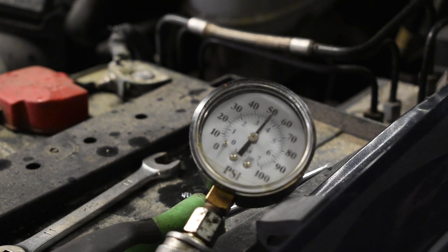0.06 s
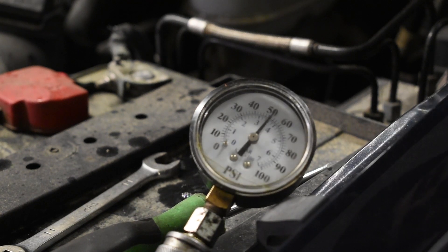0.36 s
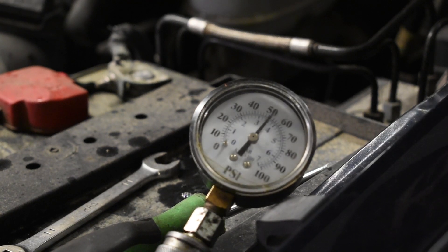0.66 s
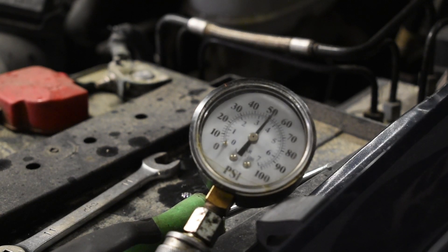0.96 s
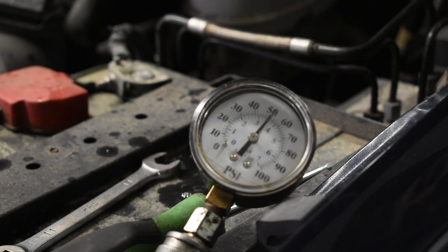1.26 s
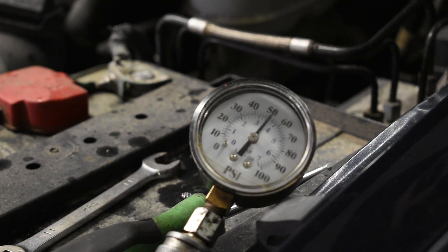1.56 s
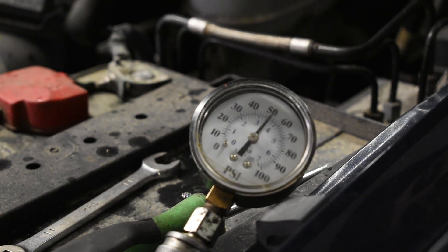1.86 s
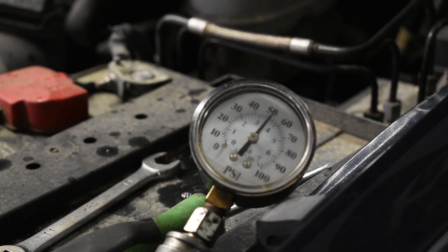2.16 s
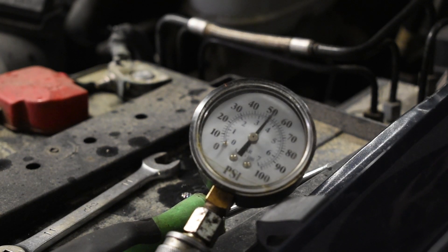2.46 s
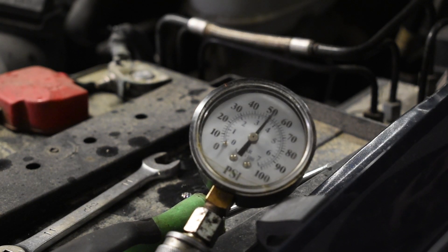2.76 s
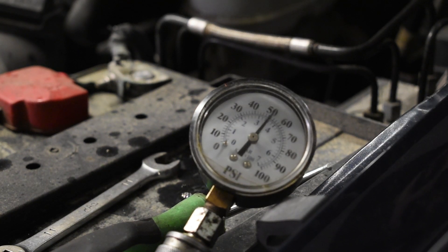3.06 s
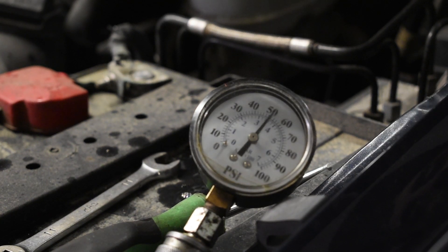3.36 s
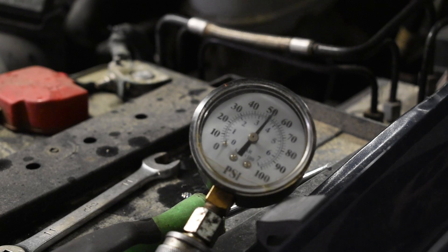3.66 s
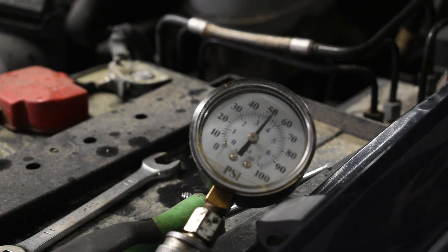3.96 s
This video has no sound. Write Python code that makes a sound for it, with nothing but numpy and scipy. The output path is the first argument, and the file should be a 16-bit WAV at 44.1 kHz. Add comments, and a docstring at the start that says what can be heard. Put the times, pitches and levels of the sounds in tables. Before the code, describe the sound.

A fast metallic clicking buzz of fuel injectors runs, then stops abruptly.

```python
"""A fast metallic buzz: eight solenoid valves, probably fuel injectors, click in turn in an open engine bay.
Each snaps open and shut and rings with its own voice, so the buzz pulses once a round.
The rounds quicken in two steps and stop on a last clack at 3.5 s. That leaves bare what ran
underneath all along: a faintly throbbing pump, a wavering hum and the air of the workshop."""
import sys
import numpy as np
from scipy.fft import rfft, irfft, next_fast_len
from scipy.io import wavfile
from scipy.ndimage import uniform_filter1d, map_coordinates

SR = 44100
rng = np.random.default_rng(int(sys.argv[2]) if len(sys.argv) > 2 else 0)


def to_wav(sig):
    """Store sig (one row per channel, or 1-D mono) as 16-bit WAV at the path in sys.argv[1].

    Samples outside -1..1 are clipped; the rate is SR.
    """
    pcm = np.clip(np.atleast_2d(sig), -1, 1) * 32767
    pcm = np.round(pcm).astype(np.int16)
    wavfile.write(sys.argv[1], SR, pcm.T)  # frames by channels


N = 176400
RING_T = np.arange(int(.3 * SR)) / SR  # time axis of one hit

# colour of the workshop air: f/Hz, relative level/dB
AIR_COLOUR = [(25, -18), (55, -12), (100, -7.5), (190, -14), (260, -3.5), (430, -8), (650, -7.5),
              (1050, -14), (3000, -27.5), (8800, -29.5), (12000, -35), (15500, -41)]
# partials of the machine hum: f/Hz, level/dB
HUM_PARTIALS = [(54, -84), (160, -85.5), (241, -72.5), (279, -73), (377, -74), (500, -78), (612, -74.5)]
# swells and dips of a low drone in the hum: t/s, level/dB
DRONE_LEVELS = [(0.0, -78.5), (1.61, -79.5), (1.73, -70), (1.84, -88), (1.94, -72), (2.09, -80),
                (2.16, -71), (2.31, -80), (2.38, -66.5), (2.47, -78), (2.54, -71), (3.85, -78), (3.95, -74),
                (4.0, -91)]

# colour of a pump throb: f/Hz, relative level/dB
THROB_COLOUR = [(200, -23), (450, -13.5), (620, -2.5), (760, 2), (950, -15), (1600, -20), (3000, -31),
                (8000, -31.5), (15000, -44)]
# pump throbs after the buzz: t/s, level/dB, attack/s
BARE_THROBS = [(3.515, -58, .004), (3.570, -53.5, .004), (3.628, -53, .005), (3.684, -58.5, .001),
               (3.734, -59.5, 0.0013), (3.794, -53.5, 0.0091), (3.845, -57, .006), (3.906, -56, 0.0022),
               (3.959, -56.5, .002)]

# colour of a click: f/Hz, relative level/dB
CLICK_COLOUR = [(150, -40), (280, -8), (450, -11.5), (800, -5.5), (1120, -0.5), (1340, -9), (1520, -3.5),
                (1850, -2.5), (2080, -0.5), (2380, 1), (2700, -7), (3100, -2.5), (3700, -3), (5200, -5),
                (6450, 1.5), (8000, -4), (9500, 1.5), (11000, -5), (13500, -10), (15700, -16.5)]
# colour of the crowded modes in the surrounding metal: f/Hz, relative level/dB
WASH_COLOUR = [(600, -28.5), (1100, -4.5), (1330, -12.5), (1600, -0.5), (1850, -2.5), (2050, -13.5),
               (2300, -8.5), (2700, -16), (3700, -14), (5200, -20.5), (6250, -12.5), (7800, -24.5),
               (9200, -21), (15000, -49)]
# low modes of the fuel rail, rung by every valve: f/Hz, level/dB, t60/s
RAIL_MODES = [(798.3, -68, 0.15), (960.7, -69.5, 0.14)]
# each valve's modes on its seat in the rail: f/Hz, level/dB, wait/ms (negative acts as 0)
VALVE_VOICES = [
    [(1034, -45.5, 5.6), (1558, -42, 5.5), (1794, -37.5, 0), (2447, -44.5, .3), (2290, -45.5, 6),
     (3647, -46, 0.6), (6620, -42.5, 1), (7105, -44, 2), (9152, -41, 0.5)],
    [(963.6, -46, 1.4), (1187, -46.5, 5), (1615, -36, 1.5), (1749, -37, 0), (2280, -50, 4), (2813, -51, 1),
     (3820, -49, 6), (6220, -49.5, 3)],
    [(1106.4, -42, 2.45), (1682, -41.5, 6), (1756, -37.5, .2), (2993, -52, 2.9), (5950, -49, 3),
     (6740, -49, 5.6), (9260, -48, 3.5)],
    [(1625, -54, 0.73), (1820, -42, 3.1), (3120, -52, 0.95), (6530, -48.5, 2), (7470, -41, 2.5),
     (10330, -40.5, 2), (11460, -49, 2.2), (12300, -50, 2)],
    [(1098, -46.5, -2), (1745, -39.5, 0.6), (1914, -46, 5.5), (3210, -54, -0.5), (6174, -50, 0.5)],
    [(1140, -46.5, 0.5), (1508, -43.5, 3), (1668, -41.5, -1.5), (1886, -47, 7), (3710, -50.5, 0),
     (6320, -41.5, 0), (9270, -44, 0), (9860, -49, 4)],
    [(980, -48, 2.7), (1167, -47, 7.1), (1667, -37.6, 1.6), (3670, -52, 1), (4460, -48.5, 0.51),
     (4810, -49, 1.3), (11430, -46.5, 0.87)],
    [(1110.5, -40.5, .4), (1598, -47, 2.5), (1814, -44.5, 3.3), (6050, -48.5, 4.4), (6500, -47, 3.6),
     (9380, -50, 3), (10885, -48.5, 1.9), (13680, -52, 3)],
]
# clicks in firing order: lag/ms, time open/ms, opening level/dB, closing level/dB, tilt/(dB per octave)
VALVE_CLICKS = [(.1, 2, -47, -44, -0.1), (1.2, 3.2, -51.5, -47, 0), (2, 3, -49, -49.5, 0),
                (.1, 3.2, -45, -45, 0.4), (.5, 2.9, -51, -48.5, 0), (.5, 1.5, -47, -46, 1),
                (.6, 3.3, -47, -46.5, -0.5), (2.4, 2, -49, -46, 1.5)]
# stretches of even firing: start t/s, valve-to-valve step/s, number of strokes
FIRING_RUNS = [(-.001, .01375, 8), (.109, .0125, 239), (3.0965, .01125, 36)]
METAL_ATTACK_S = 0.0018


def amp(db):
    """Decibels to gain."""
    return 10 ** (np.asarray(db) / 20)


def along(points, hz):
    """Read a colour curve on a log frequency axis."""
    f, db = np.transpose(points)
    return np.interp(np.log(hz + 1), np.log(f + 1), db)


def noise(colour, size=len(RING_T), eq=lambda hz: 0):
    """Noise of rms 1, shaped by a colour table and an optional EQ curve in dB."""
    hz = np.fft.rfftfreq(size, 1 / SR)
    phases = np.exp(2j * np.pi * rng.random(len(hz)))
    x = irfft(amp(along(colour, hz) + eq(hz)) * phases, size)
    return x / np.sqrt(np.mean(x ** 2) + 1e-20)


def wobble(rate):
    """A smooth random curve, rate knots a second."""
    knots = rng.standard_normal(int(N * rate / SR) + 4)
    return map_coordinates(knots, [np.arange(N) * rate / SR])


def add(track, s, sound):
    """Mix a sound into the track at s seconds."""
    i = round(s * SR)
    part = sound[max(-i, 0):max(N - i, 0)]
    track[max(i, 0):][:len(part)] += part


def delayed(x, ms):
    """Delay x, keeping its length."""
    return np.pad(x, (max(round(ms * SR / 1000), 0), 0))[:len(x)]


def fade(attack_s, t60_s):
    """A quick attack and an exponential tail."""
    return (1 - np.exp(-RING_T / attack_s)) * np.exp(-np.log(1000) * RING_T / t60_s)


def ring(hz, db, attack_s, t60_s, wait_ms=0):
    """One damped mode, which may swell a little late."""
    return amp(db) * np.sin(2 * np.pi * hz * RING_T) * delayed(fade(attack_s, t60_s), wait_ms)


def workshop_air():
    """A quiet, dark bed of room tone."""
    return amp(-68) * noise(AIR_COLOUR, N)


def machine_hum():
    """Low partials and a swelling drone, each wavering in level and phase."""
    waver_db, drift_rad, drone_hz = 1, 0.52, 123.3
    t = np.arange(N) / SR
    drone_db = np.interp(t, *np.transpose(DRONE_LEVELS))
    out = np.zeros(N)
    for hz, db in [*HUM_PARTIALS, (drone_hz, drone_db)]:
        peak = np.sqrt(2) * amp(db + waver_db * wobble(8.01))
        out += peak * np.sin(2 * np.pi * hz * t + drift_rad * wobble(8))
    return out


def pump():
    """The pump throbs in soft puffs, about eighteen a second, under the buzz and after it."""
    period_s, jitter_s, covered_db, covered_attack_s = .0555, .003, -57.5, 0.0027
    beats = BARE_THROBS[0][0] - period_s * np.arange(1, 64)
    covered = [(s + jitter_s * rng.standard_normal(), covered_db, covered_attack_s) for s in beats]
    out = np.zeros(N)
    for s, db, attack_s in [*BARE_THROBS, *covered]:
        add(out, s, amp(db) * fade(attack_s, t60_s=0.13) * noise(THROB_COLOUR))
    return out


def metalwork_eq():
    """Dense resonances of the metalwork: an EQ curve of narrow random peaks and dips."""
    depth_db, spacing_hz = 2, 90
    knots = rng.standard_normal(2048)
    return lambda hz: depth_db * np.tanh(map_coordinates(knots, [hz / spacing_hz], mode="wrap"))


def click(db, eq=lambda hz: 0):
    """A needle hits its stop: dense metal modes die fast, the bay answers for longer."""
    snap = fade(attack_s=0.00017, t60_s=0.038)
    bay_tail = amp(-14) * fade(attack_s=0.0014, t60_s=0.23)
    return amp(db) * np.hypot(snap, bay_tail) * noise(CLICK_COLOUR, eq=eq)


def last_clack():
    """A click with a short, lower ring ends the buzz."""
    body = ring(hz=1409, db=-39, attack_s=METAL_ATTACK_S, t60_s=0.035)
    out = np.zeros(N)
    add(out, s=3.5, sound=body + click(db=-52))
    return out


def valve_stroke(clicks, voice, metalwork):
    """One valve clicks open and shut, ringing its own modes, the rail and the metal around."""
    lag_ms, open_ms, open_db, close_db, tilt_db = clicks
    eq = lambda hz: metalwork(hz) + tilt_db * np.log2(np.maximum(hz, 1120))  # tilts above 1120 Hz
    opening = click(open_db, eq)
    closing = delayed(click(close_db, eq), open_ms)
    seat = sum(ring(hz, db, attack_s=0.0015, t60_s=0.05 * (1000 / hz) ** 0.26, wait_ms=ms)
               for hz, db, ms in voice)  # higher modes die sooner
    rail = sum(ring(hz, db, METAL_ATTACK_S, t60_s) for hz, db, t60_s in RAIL_MODES)
    wash = amp(-63.5) * fade(METAL_ATTACK_S, t60_s=0.58) * noise(WASH_COLOUR)
    return delayed(opening + closing, lag_ms) + seat + rail + wash


def valve_buzz():
    """Eight valves fire in turn, each repeating its own stroke almost exactly."""
    scatter_db, grit_db = -0.11, -15.5
    metalwork = metalwork_eq()
    strokes = [valve_stroke(clicks, voice, metalwork) for clicks, voice in zip(VALVE_CLICKS, VALVE_VOICES)]
    times = [start + step * k for start, step, count in FIRING_RUNS for k in range(count)]
    buzz = np.zeros(N)
    for k, s in enumerate(times):
        add(buzz, s, amp(scatter_db * rng.standard_normal()) * strokes[k % len(strokes)])
    # a little grit rides the envelope, so no two strokes sound quite alike
    envelope = np.sqrt(np.abs(uniform_filter1d(buzz ** 2, size=128)))
    return buzz + amp(grit_db) * envelope * noise(CLICK_COLOUR, N)


def scene():
    """The mono mix, heard from just above the engine."""
    return (valve_buzz() + last_clack() + pump() + machine_hum() + workshop_air())[None]


def record(dry):
    """A brick-wall low-pass trims the very top."""
    top_hz = 15780
    size = next_fast_len(N + SR // 2)
    passband = np.fft.rfftfreq(size, 1 / SR) < top_hz
    return irfft(rfft(dry, size) * passband, size)[..., :N]


dry = scene()
out = record(dry)
to_wav(out)
```